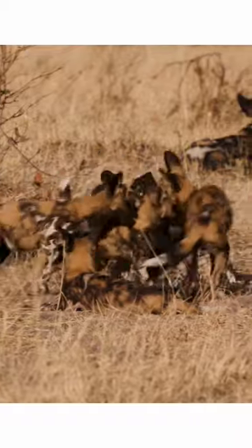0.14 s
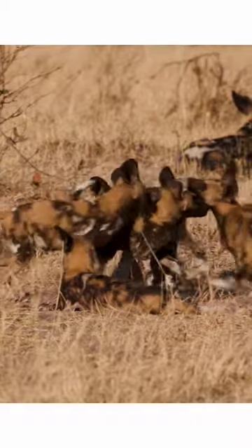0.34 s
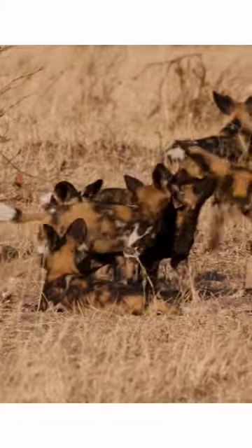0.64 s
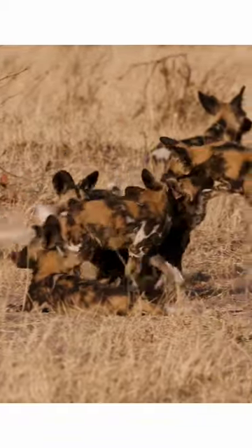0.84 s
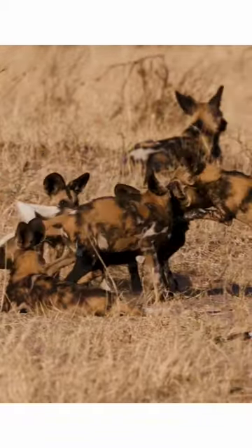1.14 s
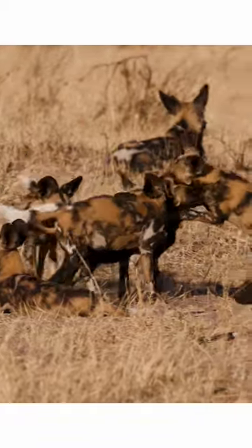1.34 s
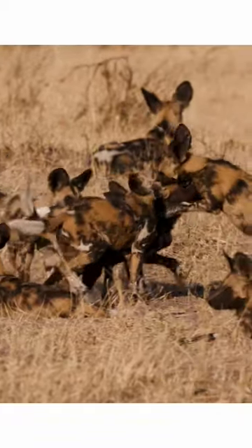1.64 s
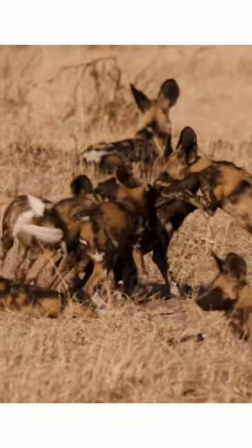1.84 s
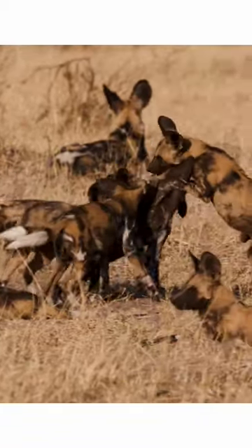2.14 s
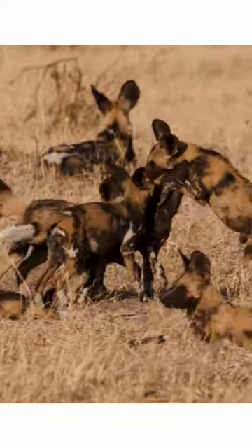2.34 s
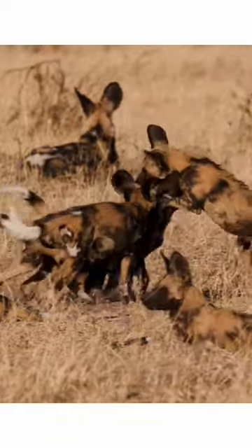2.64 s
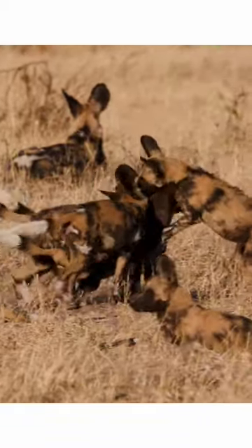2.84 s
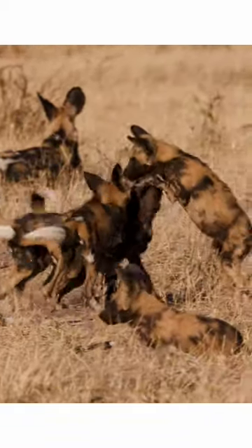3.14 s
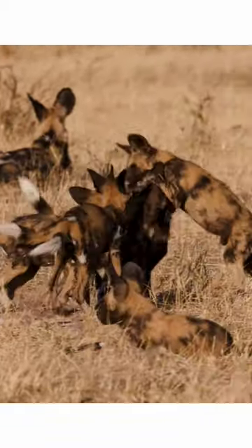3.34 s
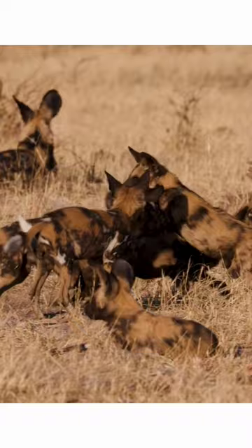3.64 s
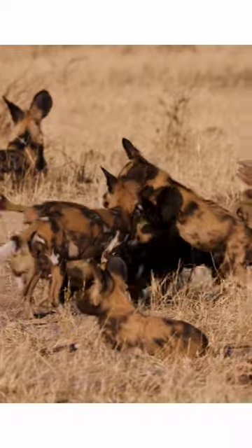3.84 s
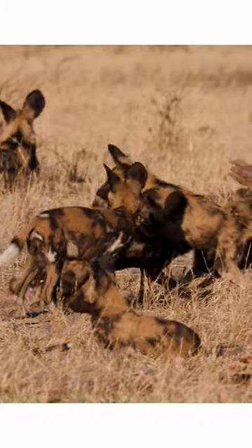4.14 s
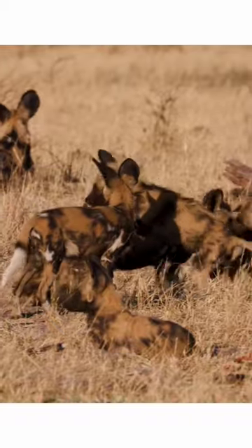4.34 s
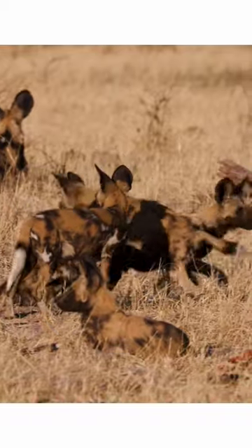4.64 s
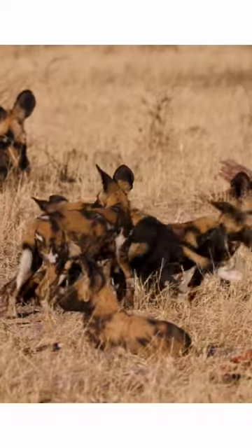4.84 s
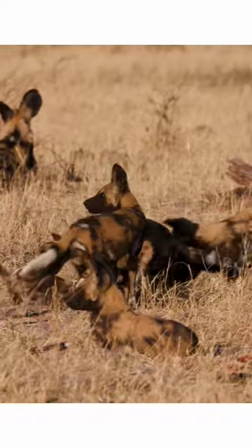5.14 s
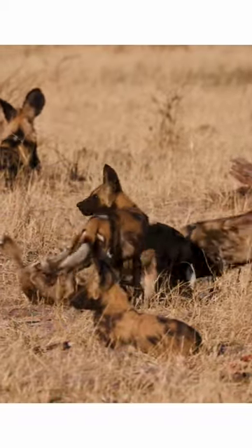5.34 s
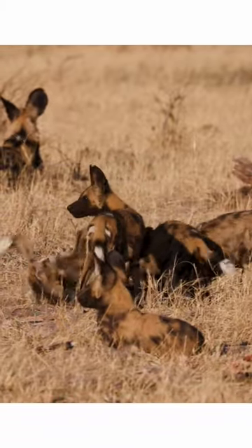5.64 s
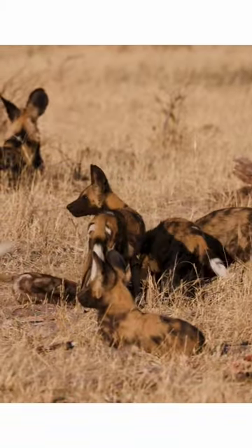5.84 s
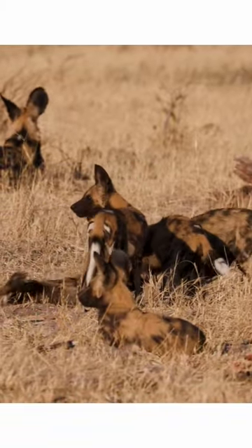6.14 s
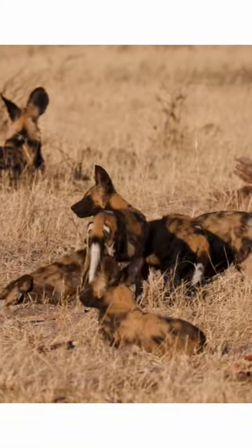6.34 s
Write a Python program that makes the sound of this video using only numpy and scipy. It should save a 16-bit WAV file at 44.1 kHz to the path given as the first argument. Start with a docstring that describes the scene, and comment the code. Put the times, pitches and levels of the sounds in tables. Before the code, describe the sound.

Close, throaty carnivore snarling in uneven bursts, with rough rasp, sputtering flaps and low chest rumble, and almost silent open grassland behind.

```python
"""A big carnivore growls and snarls close to the microphone, breath after breath, over faint air hiss.
Each breath is noise chopped by loose folds that flutter unevenly and flap, hard or soft.
It rings chest, throat, mouth and the long tract above, whose shape changes from phrase to phrase.
The hiss is steady coloured noise; the recorder limits the band of it all."""
import sys
import numpy as np
from scipy import signal
from scipy.fft import rfft, irfft
from scipy.io import wavfile
from scipy.ndimage import uniform_filter1d

SR = 44100
rng = np.random.default_rng(int(sys.argv[2]) if len(sys.argv) > 2 else 0)


def persist_wave(psi):
    """Save psi, clipped to +-1, as 16-bit WAV."""
    counts = np.round(np.clip(psi, -1, 1) * 32767).astype(np.int16)
    wavfile.write(sys.argv[1], SR, np.atleast_2d(counts).T)


N = 285768

# Flaps of the folds at set times, hard and soft, levels before the drive offsets of flap_gates:
# (time [s], rasp level [dB], mouth level [dB], throat level [dB])
SET_FLAPS = [(0.0224, -18.5, -32, -24), (0.0565, -18, -36, -33), (0.0857, -19.5, -53, -48),
             (0.1487, -15, -50, -31), (0.1815, -20, -56, -44), (0.2265, -18, -64, -30),
             (0.2513, -20, -55, -32), (0.822, -26, -44, -27), (0.8998, -12, -28.5, -32),
             (0.9193, -19, -35, -25), (0.9687, -18.5, -27.5, -38), (1.0465, -24, -53, -30),
             (1.0817, -14, -50, -41), (1.0954, -16.5, -36.5, -29), (1.1422, -30, -34, -29),
             (1.3915, -29, -51, -35.5), (1.5775, -20.5, -43, -29), (1.6373, -19, -32, -43),
             (1.675, -21.5, -28, -27), (2.115, -18.5, -41, -38), (2.1801, -14.5, -26.5, -16),
             (2.224, -19.5, -34, -22), (2.3027, -2.5, -22, -40), (2.3266, -27, -33, -38),
             (2.3454, -14, -38, -28), (2.3746, -16.5, -38, -17), (2.5935, -23, -60, -27.5),
             (3.052, -18.5, -50, -31), (3.0854, -15, -30, -28), (3.1315, -27, -27.5, -37),
             (3.517, -23.5, -39, -43), (3.5944, -15, -43, -33.5), (3.6274, -14, -34.5, -26.5),
             (3.6628, -17.5, -39, -29), (3.6915, -10.5, -31.5, -29), (3.7868, -39, -39, -31.5),
             (3.8434, -17.5, -46, -44), (3.8975, -26, -49, -27), (3.9404, -33.5, -53, -54),
             (4.0794, -32.5, -29, -26), (4.096, -21, -37.5, -33), (4.2038, -21, -29, -30),
             (4.2305, -31, -44, -43), (4.318, -39, -52, -39.5), (4.5076, -41.5, -53, -48),
             (5.285, -28, -30.5, -47), (5.3936, -36, -44, -31), (5.602, -11, -23, -20.5),
             (5.6408, -10, -17, -31), (5.8458, -16.5, -28, -26.5), (5.8718, -12.5, -37, -39),
             (6.078, -18.5, -26.5, -38), (6.1125, -16.5, -44, -27), (6.146, -21, -35, -23.5),
             (6.2944, -39, -40, -35), (6.3285, -33, -34, -34.5), (6.365, -18.5, -40, -22),
             (6.3964, -19.5, -39, -33), (6.4358, -23.5, -32, -16), (6.4646, -22.5, -34, -21)]
# How the folds and the upper tract behave in each phrase: (end time [s], random flutter depth [0-1],
# broad rasp offset [dB], brightness [dB per octave, far above 4 kHz], closure before a flap [0-1])
PHRASES = [(0.358, 0.1, -4, -1, 0.6), (0.748, 0.2, -5.5, -1, 0), (1.251, 0.41, -5, -0.7, 0),
           (2.303, 0, -5.5, -0.5, 0.5), (3, 0.06, -3.5, 4.5, 0.35), (3.769, 0.4, -2, -3.1, 0.04),
           (4.4, 0.46, -3, 1.5, 0.13), (5.221, 0.05, -1.5, 1, 0), (5.603, 0.39, -9, 3, 0),
           (6.134, 0.38, -2, 0.2, 0), (6.6, 0.08, -5.5, 7, 0.77)]


def gain_of(db):
    """Decibels to amplitude."""
    return 10 ** (np.asarray(db) / 20)


def evened(x):
    """Scales to rms 1."""
    return x / np.sqrt(np.mean(abs(x) ** 2) + 1e-20)


def curve(points, hz):
    """Amplitude of a dB spectrum at hz, joined on a log frequency axis."""
    point_hz, point_db = np.transpose(points)
    return gain_of(np.interp(np.log(hz + 1), np.log(point_hz + 1), point_db))


def modes(rows, hz, spread=1.224):
    """Response of fixed resonances, each applied twice with alternating sign for dark valleys."""
    response = 0
    for k, (centre_hz, width_hz, db) in enumerate(rows):
        response = response + (-1) ** k * gain_of(db) / (1 + 2j * (hz - centre_hz) / (spread * width_hz)) ** 2
    return response


def colour(x, response):
    """Filters x so that unit noise stays unit noise."""
    return irfft(rfft(x) * evened(response), len(x))


def glide(x, hz, width_hz):
    """A resonance of peak gain 1 that follows the curve hz, applied twice."""
    turn = np.exp(2j * np.pi * np.cumsum(hz) / SR)
    r = np.exp(-np.pi * width_hz / SR)
    # shift the band down to 0 Hz, smooth it with two equal poles, shift it back
    smooth = signal.lfilter([(1 - r) ** 2], np.convolve([1, -r], [1, -r]), x / turn)
    return 2 * (turn * smooth).real


def drift(length, count):
    """Slow random curve through unit-variance knots every count samples, smoothed."""
    knots = rng.standard_normal(length // count + 2)
    joined = np.interp(np.arange(length) / count, np.arange(len(knots)), knots)
    return uniform_filter1d(joined, count // 2)


def phrase_now():
    """Number of the phrase at each sample."""
    return np.searchsorted(np.array(PHRASES)[:-1, 0], np.arange(N) / SR)


def by_phrase(column):
    """One 0-1 column of the phrase table as a step curve."""
    return np.clip(np.array(PHRASES)[phrase_now(), column], 0, 1)


def levels():
    """Drive of chest, throat, mouth and rasp in dB at each sample, from voice, rasp and placing of each stretch."""
    # One curve a stretch of growl, a long breath having two: (time [s], voice level [dB], breath rasp level [dB])
    stretches = [
        [(0.0, -36.5, -33.5), (0.25, -32.5, -44.5), (0.334, -38, -43.5), (0.4, -53, -53.5)],
        [(0.42, -46, -46), (0.58, -45.5, -43.5), (0.66, -34.5, -45.5), (0.746, -69, -79), (0.75, -57, -75)],
        [(0.77, -45.5, -55), (0.81, -31, -41.5), (0.896, -26.5, -38), (1.202, -28.5, -40.5),
         (1.282, -47.5, -55.5), (1.32, -51, -54)],
        [(1.34, -42, -54), (1.388, -38, -46), (1.47, -42.5, -45.5)],
        [(1.49, -29, -46.5), (1.606, -24.5, -37.5), (1.62, -29.5, -55), (1.732, -20, -35), (1.842, -31, -38),
         (2.384, -18.5, -35), (2.398, -23, -39.5), (2.928, -35, -47.5), (3.0, -38, -46.5)],
        [(3.02, -30, -45.5), (3.092, -24, -34), (3.106, -28.5, -41), (3.26, -46.5, -51.5)],
        [(3.28, -42.5, -48.5), (3.32, -37.5, -43), (3.502, -23.5, -38.5), (3.548, -33.5, -38.5),
         (3.686, -26.5, -42), (3.77, -38, -53)],
        [(3.79, -35.5, -51), (3.856, -36.5, -36.5), (3.908, -26.5, -47), (4.02, -42.5, -63.5)],
        [(4.04, -32.5, -56), (4.104, -29.5, -45), (4.146, -47, -52), (4.238, -29, -45.5), (4.314, -35, -58),
         (4.39, -67.5, -60.5)],
        [(4.41, -47, -65), (4.446, -42.5, -53.5), (4.56, -43, -73)],
        [(4.58, -46, -78), (4.614, -54.5, -65.5), (4.784, -50.5, -65), (4.828, -57, -72), (5.024, -81.5, -90),
         (5.028, -46.5, -79)],
        [(5.04, -40.5, -62.5), (5.078, -41, -60.5), (5.106, -43, -76), (5.176, -64, -80), (5.226, -62, -74)],
        [(5.24, -38.5, -74), (5.298, -31.5, -34.5), (5.37, -31.5, -43), (5.538, -34, -37), (5.62, -24, -35),
         (5.69, -36, -37.5), (5.904, -29, -31), (6.26, -37, -42)],
        [(6.28, -37, -52), (6.314, -27, -44), (6.48, -22.5, -41)],
    ]
    # Where each stretch resounds, relative to its voice: (chest [dB], throat [dB], mouth [dB])
    placing = [(-1, 0, -17), (-2.5, -4.5, -21), (1.5, -6.5, -12.5), (0, -8, -18.5), (-9, -3.5, -20),
               (0.5, -8, -8), (-0.5, -7, -11), (-3, -9, -14), (-2, -4.5, -12), (-0.5, -8, -10),
               (-2.5, -10, 1.5), (-11.5, 0, -3), (-4, -1.5, -8), (-8.5, -5, -11.5)]
    mouth_follows_rasp = 0.42  # share of the rasp's rise and fall that the mouth takes over from the voice
    rasp_under_voice_db = 10.5  # usual distance of the two levels
    t = np.arange(N) / SR
    s, voice_db, rasp_db = np.vstack(stretches).T
    voice_db, rasp_db = np.interp(t, s, voice_db), np.interp(t, s, rasp_db)
    stretch = np.searchsorted([rows[0][0] for rows in stretches[1:]], t)
    placed_db = uniform_filter1d(np.array(placing, float)[stretch].T, size=1500)
    chest_db, throat_db, mouth_db = voice_db + placed_db
    mouth_db = mouth_db + mouth_follows_rasp * (rasp_db - voice_db + rasp_under_voice_db)
    return chest_db, throat_db, mouth_db, rasp_db


def flutter(depth, rate=36, jitter=0.49, size_db=4, open_s=0.014):
    """Uneven opening of the folds: rounded puffs at a wandering rate, local power kept at 1."""
    wander = evened(uniform_filter1d(rng.standard_normal(N), 900))
    cycles = np.floor(np.cumsum(rate * np.exp(jitter * wander)) / SR)
    opens = np.diff(cycles, prepend=0) * gain_of(size_db * rng.standard_normal(N))
    puffs = evened(signal.oaconvolve(opens, np.hanning(round(open_s * SR)))[:N])
    gate = 1 - depth + depth * abs(puffs)
    return gate / np.sqrt(uniform_filter1d(gate ** 2, size=6000))


def chance_flaps(*cavities_db):
    """Flaps at chance moments between the set ones, levels against the breath around them: rows like SET_FLAPS."""
    slots_per_s, spread_db = 18, 3  # one chance flap a slot; random spread of its levels
    recover_s = 0.02  # the folds need this long between a set flap and a chance one
    # Mean level over the breath: (rasp [dB], mouth [dB], throat [dB])
    over_breath_db = (14, 3, 1)
    when, *sizes = rng.standard_normal((round(slots_per_s * N / SR), 4)).T
    # 0.99 keeps the last one inside the scene
    s = (np.arange(len(when)) + 0.5 + np.tanh(when) / 2) / slots_per_s * 0.99
    at = (s * SR).astype(int)
    free = abs(s[:, None] - np.array(SET_FLAPS)[:, 0]).min(1) > recover_s
    columns = [s]
    for db, over_db, size in zip(cavities_db, over_breath_db, sizes):
        columns.append(db[at] + over_db + spread_db * size)
    return np.transpose(columns)[free]


def flap_gates(flaps, shut_ms=9):
    """Envelopes of the flaps for rasp, mouth and throat, and of the folds' closure before each."""
    usual_ms, halving_db = 9.9, 19  # length of a flap of -25 dB rasp; one this much harder lasts half as long
    # Mean drive during a flap against the level it rings up, one row each: rasp, mouth, throat (offset [dB])
    drive_db = [
        [-9.5],
        [2],
        [2],
    ]
    gates, shut, t = np.zeros((3, N)), np.zeros(N), np.arange(1500) / SR
    closing = np.hanning(round(shut_ms * SR / 500))  # shut_ms to close, as long to part again
    for s, *levels_db in flaps:
        ms = np.clip(usual_ms * 2 ** (-(levels_db[0] + 25) / halving_db), 3, 20)
        u = t / (ms / 1000)
        at = round(s * SR)
        part = gates[:, at:][:, :len(t)]
        # bursts open, holds, and is cut off as the folds meet
        burst = np.minimum(2.5 * u, 1) * np.exp(-u ** 3)
        part += (gain_of(levels_db)[:, None] * burst)[:, :part.shape[1]]
        before = shut[:at][-len(closing):]
        before += closing[len(closing) - len(before):]
    return gates * gain_of(drive_db), np.minimum(shut, 1)


def throat(drive):
    """The first resonance with a weaker one under it; the band below is swallowed."""
    # Middle of the first resonance, one a phrase: (frequency [Hz])
    first_hz = [423, 396, 379, 359, 368, 362, 371, 391, 394, 387, 378]
    steps_hz = np.array(first_hz)[phrase_now()] * 1.0
    hz = uniform_filter1d(steps_hz, size=3000) + 18 * drift(N, count=3000)
    ring = glide(drive, hz, 147.7) + gain_of(-9.0) * glide(drive, hz * 0.804, 55)
    return gain_of(22.5) * signal.sosfilt(signal.butter(2, 235, "high", fs=SR, output="sos"), ring)


def cavity(drive, rows, lips=1, front_hz=0, wander_hz=35, swell_db=2.5, grain_db=3.0, spread=1.05, loss=0.032):
    """Resonances that slide, swell and sputter each on its own as tongue and lips move; unit noise stays unit."""
    out, power = np.zeros(len(drive)), 1e-12
    for k, (hz, width_hz, db) in enumerate(rows):
        # the lips move only the resonance nearest front_hz
        front = lips if k == np.argmin([abs(row[0] - front_hz) for row in rows]) else 1
        track = hz * front + wander_hz * drift(len(drive), count=3000)
        band_hz = spread * width_hz + loss * hz  # walls damp the high resonances more
        swell = gain_of(db + swell_db * drift(len(drive), count=2500))
        sputter = gain_of(grain_db * drift(len(drive), count=350))
        out += (-1) ** k * swell * glide(drive * sputter, track, band_hz)
        power += gain_of(2 * db) * band_hz * np.pi / SR
    return out / np.sqrt(power)


def tract(mouth_drive, rasp_drive, hz):
    """Each phrase passes its own mouth and upper resonances over a broad rasp."""
    # One tract shape a phrase, widths before wall loss: (frequency [Hz], width [Hz], relative level [dB])
    shapes = [
        [(1114, 190, -14), (1804, 125, 6.5), (2610, 190, 3), (3010, 250, -0.5), (3600, 25, -21),
         (4500, 58, -10), (6600, 160, -9), (2000, 340, -2.5)],
        [(1694, 150, 1), (2630, 62, -5.5), (3013, 57, 0), (4000, 140, -6.5), (4500, 230, -16.5),
         (5300, 52, -12), (6100, 350, -17), (1040, 260, -15), (2010, 330, -7)],
        [(837, 45, 12.5), (1223, 300, 13.5), (1675, 33, -3.5), (2180, 83, -0.5), (2530, 100, -2),
         (3000, 200, 3.5), (3580, 230, 1), (4270, 170, 0.5), (4810, 59, -8), (7460, 62, -11)],
        [(1087, 81, 10.5), (2610, 420, 4), (3624, 110, 18.5), (3670, 89, -12.5), (5000, 94, 12),
         (5000, 110, -6), (5980, 50, -28), (6540, 57, 7), (6500, 230, 7.5), (7760, 220, 0.5), (10050, 640, -3),
         (881, 40, 3.5)],
        [(1076, 120, -1), (2496, 180, -4), (3180, 35, 5), (3850, 150, -2), (4620, 29, 5), (5980, 40, -6),
         (6800, 290, -1), (7600, 52, -7.5), (9760, 240, -11)],
        [(853, 79, 5), (1205, 230, 9.5), (1930, 210, -1.5), (2384, 170, 4.5), (3380, 340, 1.5), (4120, 180, 3),
         (6450, 890, -3.5), (6420, 710, -2)],
        [(849, 85, 8), (1200, 200, 3.5), (2390, 240, -6), (3520, 230, 4.5), (4280, 180, -5), (5100, 200, -6),
         (6640, 520, -8)],
        [(832, 78, -3), (1201, 118, 2.5), (3390, 200, -10.5), (3870, 240, -14.5), (6600, 740, -22)],
        [(810, 260, -6.5), (1243, 150, 1), (1760, 110, -20), (2880, 160, -1.5), (3630, 230, -2),
         (4370, 120, -14), (4880, 160, -12.5), (5800, 190, -8.5), (6680, 190, -12)],
        [(890, 79, -11), (1217, 125, -3.5), (1716, 110, -4), (2000, 71, 1), (2876, 370, -4), (4200, 280, -1),
         (6340, 310, -11.5), (7280, 72, -8), (9200, 37, -27)],
        [(850, 120, 3), (1830, 330, -6), (2886, 120, 4), (3630, 99, -9), (5700, 100, -34), (7130, 76, -16),
         (1240, 170, -19)],
    ]
    # Broad rasp under the resonances, before tilt and scaling: (frequency [Hz], relative density [dB per Hz])
    between = [(820, -47.5), (1400, -11), (1990, -10.5), (2380, -19.5), (2910, -7.5), (3380, -6.5),
               (4050, -11), (6420, -13), (15300, -41)]
    # Lips and jaw move the front cavity: (time [s], factor on its frequency, frequency near which it rests [Hz])
    lip_moves = [(0, 0.97, 1750), (.35, 0.96, 1750), (.5, 1.08, 1750), (.72, 1.1, 1750), (.76, 1.0, 3650),
                 (5.27, 1.0, 3650), (5.29, 0.87, 3650), (5.36, 1.03, 3650), (5.55, 1.1, 3650),
                 (5.64, 1.0, 3650)]
    mouth_top_hz = 1450  # resonances below belong to the mouth, the others to the rasp
    tube_echo = 0.17  # share reflected at the end of the windpipe
    out, t, start = np.zeros(N), np.arange(N) / SR, -1
    s, factor, rest_hz = np.transpose(lip_moves)
    lips = np.interp(t, s, factor)
    for shape, (end, _, broad_db, bright_db, _) in zip(shapes, PHRASES):
        turn = uniform_filter1d(((t >= start) & (t < end)) * 1.0, size=2400)
        span = slice(max(round(start * SR) - 1200, 0), round(end * SR) + 3000)
        low = [row for row in shape if row[0] < mouth_top_hz]
        high = [row for row in shape if row[0] >= mouth_top_hz]
        front_hz = np.interp(end - 0.1, s, rest_hz)
        out[span] += cavity((turn * mouth_drive)[span], low)
        out[span] += cavity((turn * rasp_drive)[span], high, lips[span], front_hz)
        tilt = gain_of(bright_db * np.log2(hz / 4000 + 1))
        spacing_hz = rng.uniform(381.8, 427.8)  # minor resonances of the windpipe
        pipe = 1 / (1 - tube_echo * np.exp(-2j * np.pi * hz / spacing_hz))
        out += gain_of(broad_db - 1.0) * colour(turn * rasp_drive, curve(between, hz) * tilt * pipe)
        start = end
    return out + gain_of(-8.5) * colour(mouth_drive, modes([(647, 370, 0)], hz))


def growl():
    """One turbulent, fluttering breath drives chest, throat, mouth and upper tract; flaps burst through it."""
    # Chest resonances, widths before spreading: (frequency [Hz], width [Hz], relative level [dB])
    chest_modes = [(29.8, 27, -17), (49.3, 40, -4.5), (86, 26, 2), (137.1, 46.7, -4.5)]
    chest_db, throat_db, mouth_db, rasp_db = levels()
    hz, noise = np.fft.rfftfreq(N, 1 / SR), rng.standard_normal(N)
    gate = flutter(by_phrase(column=1))
    flaps = [*SET_FLAPS, *chance_flaps(rasp_db, mouth_db, throat_db)]
    (rasp_flaps, mouth_flaps, throat_flaps), shut = flap_gates(flaps)
    passing = gate * (1 - by_phrase(column=4) * shut)
    # the deep cavities feel less flutter
    chest = colour(noise * gate ** 0.86 * gain_of(chest_db), modes(chest_modes, hz))
    throat_drive = noise * np.hypot(gate ** 0.1 * gain_of(throat_db), throat_flaps)
    mouth_drive = noise * np.hypot(passing * gain_of(mouth_db), mouth_flaps)
    slap = colour(rng.standard_normal(N), modes([(3620, 6200, 0)], hz))  # flaps are duller than breath
    rasp_drive = noise * passing * gain_of(rasp_db) + 0.54 * slap * rasp_flaps
    return chest + throat(throat_drive) + tract(mouth_drive, rasp_drive, hz)


def air():
    """Faint steady hiss of the open ground and the microphone: coloured noise."""
    # Spectrum of the hiss before scaling: (frequency [Hz], relative density [dB per Hz])
    hiss = [(26, -34), (45, -6), (119, -2.5), (782, 0.5), (1100, -14.5), (4990, -25), (9650, -14.5),
            (10900, -15.5), (15300, -13)]
    level_db = -64  # rms, re full scale
    return gain_of(level_db) * colour(rng.standard_normal(N), curve(hiss, np.fft.rfftfreq(N, 1 / SR)))


def scene():
    """The close growl over the air, on one channel."""
    return (growl() + air())[None]


def record(dry):
    """The band limit of the recorder: a steep low-pass."""
    edge_hz = 15500
    taps = signal.firwin(2047, edge_hz / (SR / 2), window=("kaiser", 9))
    return signal.oaconvolve(dry, taps[None], "same")


dry = scene()
out = record(dry)
persist_wave(out)
```